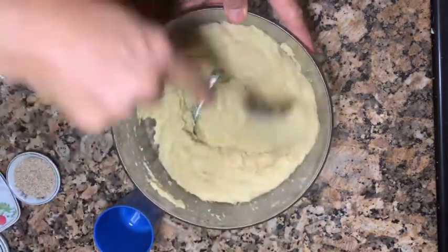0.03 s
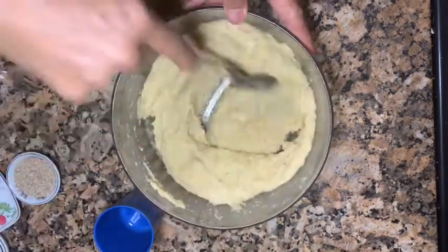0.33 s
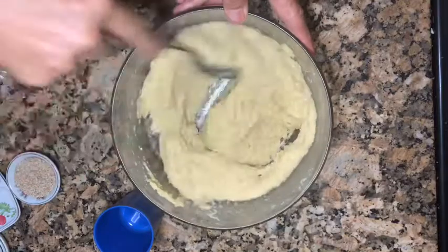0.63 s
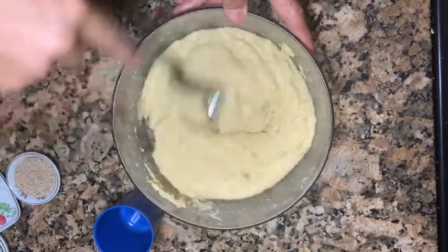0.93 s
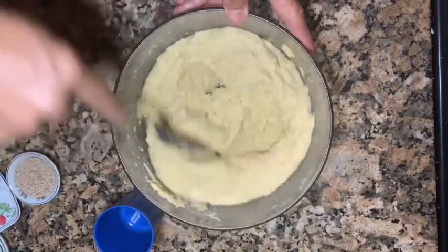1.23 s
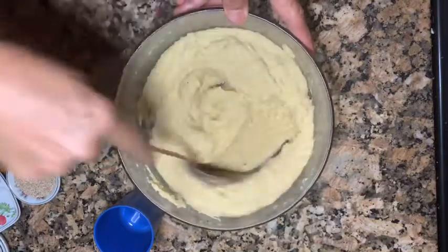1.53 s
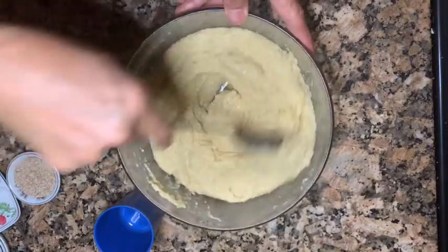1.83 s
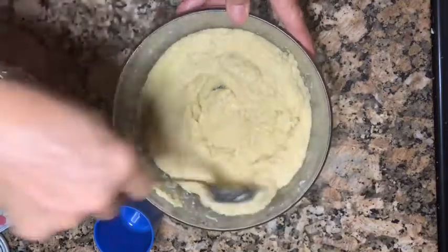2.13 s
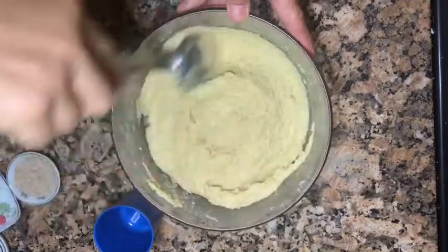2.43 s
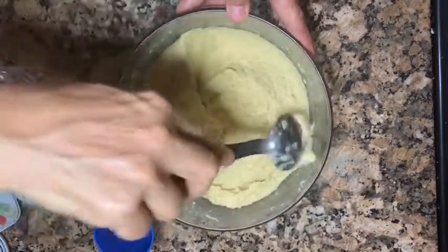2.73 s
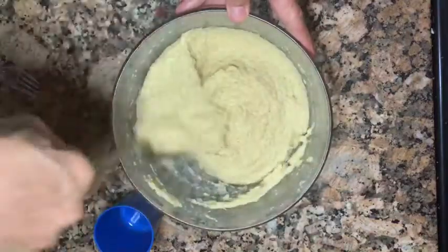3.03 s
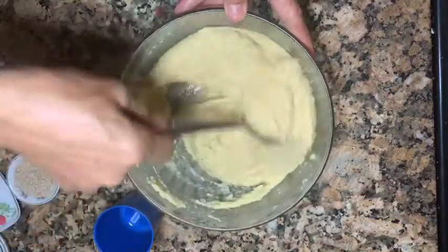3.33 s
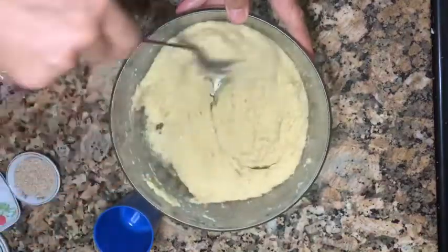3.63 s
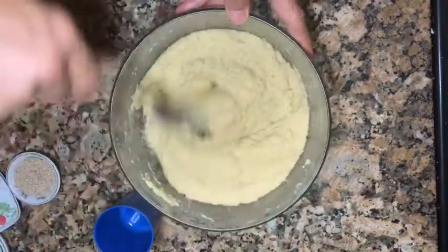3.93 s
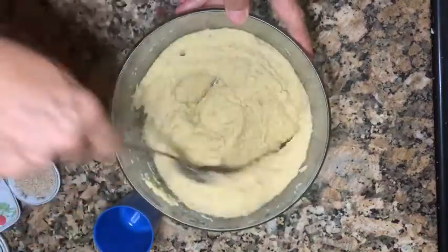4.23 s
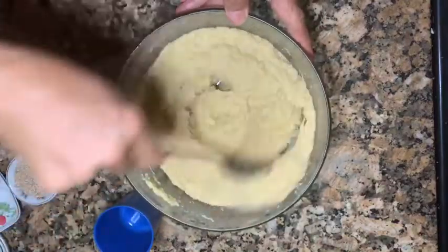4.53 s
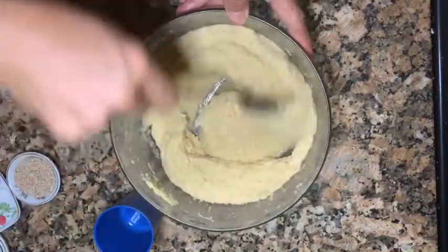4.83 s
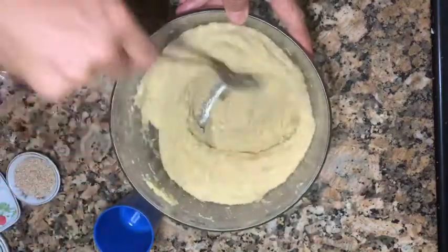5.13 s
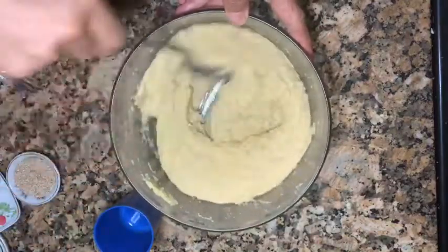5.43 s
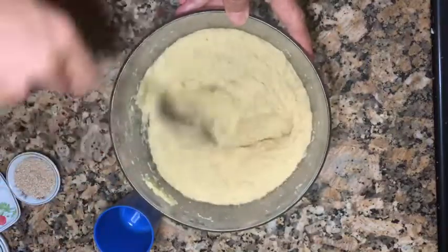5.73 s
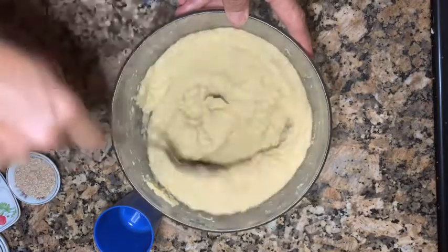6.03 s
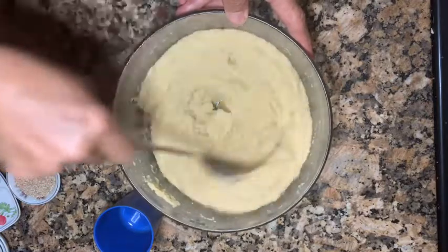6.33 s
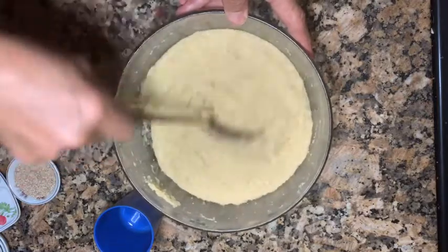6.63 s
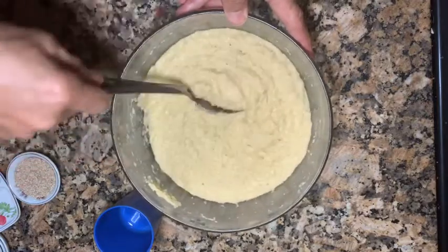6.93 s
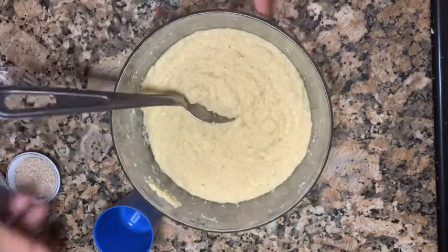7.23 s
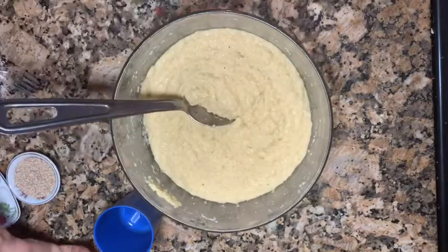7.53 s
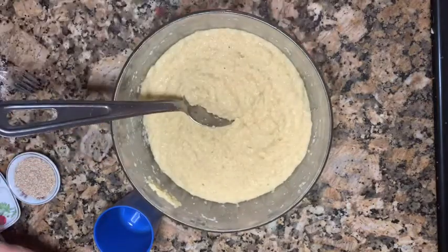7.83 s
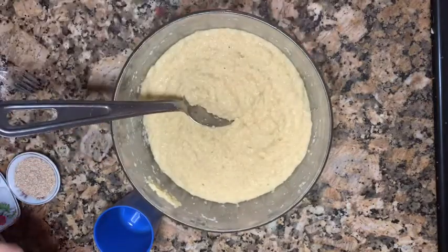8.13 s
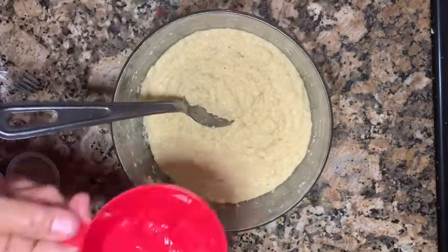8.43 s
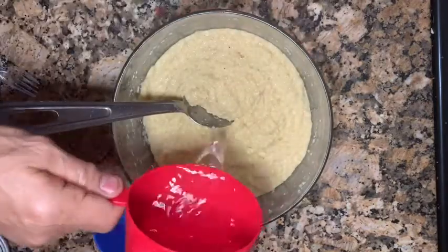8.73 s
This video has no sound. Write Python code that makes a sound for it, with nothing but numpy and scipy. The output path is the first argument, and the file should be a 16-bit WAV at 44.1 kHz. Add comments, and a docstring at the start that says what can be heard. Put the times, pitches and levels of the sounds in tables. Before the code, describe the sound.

Sticky dough crackles and pops as a metal spoon stirs and knocks in a glass bowl, then stops with a clink, over an appliance hum.

```python
"""A steel spoon beats thick dough in a hand-held glass bowl on a stone counter, in a small kitchen.
The spoon knocks, judders and scrapes on the damped glass; the dough crackles as wet strands part,
and its air pockets pop open. The spoon is laid on the rim and rings, a hand takes a plastic cup,
and at the very end water starts to trickle in. An appliance's motor hums throughout."""
import sys
import numpy as np
from scipy import signal
from scipy.fft import rfft, irfft, next_fast_len
from scipy.io import wavfile
from scipy.ndimage import uniform_filter1d

SR = 44100
rng = np.random.default_rng(int(sys.argv[2]) if len(sys.argv) > 2 else 0)


def master(y):
    """Save y as 16-bit WAV."""
    cut = np.clip(np.atleast_2d(y).T, -1, 1)
    pcm = np.round(cut * 32767)  # scale
    wavfile.write(sys.argv[1], SR, pcm.astype(np.int16))


N = 392049
TIME = np.arange(N) / SR

# tones of the bowl, damped by dough and hand: f/Hz, level/dB, t60/s (the time to fade by 60 dB)
BOWL_TONES = [(151, -0.5, 0.045), (234.7, -4, 0.024), (305, 2, 0.084), (528.7, -5, 0.13),
              (627, -5.5, 0.076), (726, -7.5, 0.068), (882, 5, 0.025), (1020, 6, 0.01), (1150, 5.5, 0.058),
              (1405, -8.5, .026), (1526, 6.5, 0.07), (1650, 5, 0.033), (1722, 4, 0.088),
              (1989, -11.5, 0.019), (2370, -13, 0.094), (2713, -8.5, 0.055), (2923, -9.5, 0.065),
              (3250, -9, 0.06), (3452, -6.5, 0.044), (3980, -11, 0.036), (4190, -17, 0.069),
              (4430, -13.5, 0.075), (4984, -11.5, 0.039), (6460, -10.5, 0.021), (6620, -12, .04),
              (8035, -4, .07), (8977, -0.5, 0.036), (9500, -5.5, 0.027), (9830, -2, 0.021),
              (11560, -4.5, 0.023)]
# turns of the spoon, each a push and a return:
# t/s, drag/dB, crackle/dB, return against push/dB, time to the return/s, hold/s
SPOON_TURNS = [(-0.201, -45.5, -45.0, -0.5, 0.18, 0.017), (0.175, -41, -43.5, -3, 0.16, 0.0),
               (0.53, -44.5, -41, -5.5, 0.2, 0.0019), (0.88, -44.5, -40.5, -7.5, 0.18, 0.0),
               (1.222, -47.5, -43.5, -7, 0.19, 0.028), (1.57, -43, -42, -12.5, 0.17, 0.0065),
               (2.203, -53.5, -47, -15, 0.21, 0.076), (2.671, -58.5, -59.5, 0.5, 0.12, 0.049),
               (2.875, -57, -54, -3.0, 0.22, 0.21), (3.517, -52.5, -52, 0, 0.22, 0.059),
               (3.896, -49, -46.5, -5, 0.18, 0.024), (4.26, -46.5, -41.5, -7.5, 0.14, 0.021),
               (4.59, -49, -51.5, 1, 0.21, 0.1), (4.991, -47, -46.5, -6, 0.18, 0.025),
               (5.339, -48.5, -47.5, -3, 0.16, 0.028), (5.681, -45.0, -50.5, -4, 0.14, 0.054),
               (6.045, -49.5, -46, -5, 0.17, 0), (6.417, -52, -48.5, -4.5, 0.17, 0),
               (6.737, -55, -52.5, -27, 0.18, 0.0012)]


def from_db(db):
    """Turn decibels into a gain."""
    return 10 ** (np.asarray(db) / 20)


def rms_one(x):
    """Scale to an average strength (rms) of 1."""
    return x / np.sqrt(np.mean(x ** 2) + 1e-20)


def peak_one(x):
    """Scale to a peak of 1."""
    return x / (np.abs(x).max() + 1e-20)


def at_hz(points, hz):
    """Read between the rows of a table, with octaves evenly spaced."""
    f, value = np.transpose(points)
    return np.interp(np.log(hz + 1e-9), np.log(f), value)


def add(out, s, sound):
    """Mix a sound in at s seconds."""
    start = max(round(s * SR), 0)
    out[start:start + len(sound)] += sound[:N - start]


def band(x, low, high, order=2):
    """Keep what lies between two frequencies."""
    sections = signal.butter(order, [low, min(high, .48 * SR)], "band", fs=SR, output="sos")
    return signal.sosfilt(sections, x)


def coloured(x, spectrum):
    """Shape the lows and highs of a sound by a table; the result has rms 1."""
    size = next_fast_len(N)
    gain = from_db(at_hz(spectrum, np.fft.rfftfreq(size, 1 / SR)))
    return rms_one(irfft(rfft(x, size) * gain, size)[..., :N])


def drift(per_s):
    """A random wander with a spread near 1."""
    knots = rng.standard_normal(2000)
    return np.interp(TIME * per_s, np.arange(len(knots)), knots)


def grains(per_s, spread_db):
    """Random clicks of uneven size."""
    sizes = from_db(spread_db * np.minimum(rng.exponential(1, N), 4)) * rng.choice([-1, 1], N)
    return sizes * (rng.random(N) < per_s / SR)


def fade(t, t60):
    """Die away by 60 dB every t60 seconds."""
    return np.exp(-np.log(1000) / t60 * t)


def swell(start, attack_s, hold_s, release_t60):
    """Rise to full strength at the start time, hold, then die away."""
    t = TIME - start
    return np.clip(1 + t / attack_s, 0, 1) * fade(np.clip(t - hold_s, 0, 3 * release_t60), release_t60)


def struck(tones, t, scatter_db, tilt_db=0, ring=1, detune=0):
    """A blow starts each tone with a random strength and sign, as if landing on a new spot."""
    hz, level_db, t60 = np.transpose(tones)[:, :, None]
    tilt = tilt_db * np.log2(hz / hz.mean())
    gain = from_db(level_db + tilt + scatter_db * rng.standard_normal(hz.shape))
    hz = hz * (1 + detune * rng.standard_normal(hz.shape))
    sign = rng.choice([-1, 1], hz.shape)
    return np.sum(gain * sign * np.sin(2 * np.pi * hz * t) * fade(t, t60 * ring), axis=0)


def brief_noises(rows, swell_s, width):
    """Short bursts of noise, each swelling and dying around its own pitch."""
    out, t = np.zeros(N), np.arange(SR // 8) / SR
    for s, peak_db, hz in rows:
        burst = rng.standard_normal(len(t)) * t * np.exp(-t / swell_s)
        add(out, s, from_db(peak_db) * peak_one(band(burst, hz / (1 + width), hz * (1 + width))))
    return out


def appliance(waver_db=3.0, air_db=-47.5, side_db=-6.5):
    """A motor's wavering hum over a low rush of air, a little louder on the left."""
    # the motor's tones: f/Hz, level/dB
    motor_tones = [(58.5, -62.5), (61.3, -46.5), (118.5, -55.5), (179, -61), (217, -62), (429, -66),
                   (2939, -89), (3488, -88), (8452, -89.5), (10008, -88)]
    # the rush of air: f/Hz, level/dB
    air_spectrum = [(20, -17.5), (40, -7.5), (55, -11.5), (80, 6.5), (125, -3.5), (220, -7), (400, -13.5),
                    (600, -25), (1000, -31), (2200, -44), (3200, -41), (4500, -48), (9000, -45.5),
                    (12000, -53.5), (16000, -62)]
    hum = np.zeros(N)
    for hz, db in motor_tones:
        strength = from_db(db + waver_db * drift(6.4)) * np.sqrt(2)
        hum += strength * np.sin(2 * np.pi * hz * TIME + .5 * drift(4))
    middle, side = coloured(rng.standard_normal((2, N)), air_spectrum)
    air = middle + from_db(side_db) * side * [[1], [-1]]
    return (hum + from_db(air_db) * air) * from_db([[1.1], [-1.1]])


def stirring(attack_s=0.13, drag_lag_s=0.0078):
    """How strong the drag and the crackle are: each turn sweeps through the dough twice."""
    drag, crackling = np.zeros(N), np.zeros(N)
    for s, drag_db, crackle_db, return_db, return_s, hold_s in SPOON_TURNS:
        for start, sweep_db in (s, 0), (s + return_s, return_db):
            # the spoon presses on the glass just after it cuts into the dough
            cutting = swell(start, attack_s, hold_s, release_t60=0.32)
            pressing = swell(start + drag_lag_s, attack_s, hold_s, release_t60=0.6)
            drag = np.maximum(drag, from_db(drag_db + sweep_db) * pressing)
            crackling = np.maximum(crackling, from_db(crackle_db + sweep_db) * cutting)
    return drag, crackling


def wet_ticks(per_s, spread_db, clump_db, cycles, pitches=14):
    """Each tiny strand parts with a tick of its own pitch; ticks of one pitch come in clusters."""
    out, clicks = np.zeros(N), grains(per_s, spread_db)
    pitch_index = rng.integers(0, pitches, N)
    for k, hz in enumerate(np.geomspace(4000, 15000, pitches)):
        decay, angle = fade(1 / SR, cycles / hz), 2 * np.pi * hz / SR
        feedback = [1, -2 * decay * np.cos(angle), decay ** 2]   # makes each click ring at hz
        cluster = clicks * (pitch_index == k) * from_db(clump_db * drift(45))
        out += np.sqrt(hz) * signal.lfilter([1 - decay ** 2, 0, decay ** 2 - 1], feedback, cluster + 1e-18)
    return out


def dough(drag, crackling, squish_db=1.0, churn_db=-9.0, thin_snap_db=-8.5, wall_hz=1630):
    """The spoon rubs coated glass, dough squishes and churns on the wall, and wet strands part."""
    # the spoon rubbing: f/Hz, level/dB
    rub_spectrum = [(90, -13), (200, 10), (330, 11), (430, -4.5), (560, 2), (800, -1.5), (1150, 0),
                    (1350, -7), (1700, -7), (2200, -11.5), (3300, -18), (6000, -27.5), (14000, -37)]
    # the dough squishing: f/Hz, level/dB
    squish_spectrum = [(900, -21), (1900, -6), (2300, -8.5), (2800, 1), (3400, -3), (4400, -5.5),
                       (5400, -2.5), (6300, -13), (7300, -4.5), (11000, -6)]
    # tiny strands parting: f/Hz, level/dB
    crackle_spectrum = [(3000, -15.5), (6000, -2), (7300, -7.5), (8200, 3), (9800, -1), (10900, -5),
                        (12300, -4.5), (14500, -13), (16000, -10)]
    sticking = from_db(4.5 * drift(60))
    clumps = from_db(4.3 * drift(40))
    rub = coloured(grains(2700, spread_db=6.5) * sticking, rub_spectrum)
    squish = coloured(grains(4000, spread_db=-1.0) * clumps, squish_spectrum)
    crackle = coloured(wet_ticks(2000, spread_db=2.5, clump_db=5.0, cycles=30) * clumps, crackle_spectrum)
    thin_snaps = coloured(wet_ticks(45, spread_db=3.5, clump_db=2.0, cycles=14), crackle_spectrum)
    churn_clicks = grains(1200, spread_db=4.5) * from_db(9.6 * drift(22))
    churn = rms_one(band(churn_clicks, wall_hz / 1.084, wall_hz * 1.084))
    squishing = from_db(squish_db) * np.sqrt(drag * crackling)   # takes both pressure and wetness
    return (drag * (rub + from_db(churn_db) * churn) + squishing * squish
            + crackling * (crackle + from_db(thin_snap_db) * thin_snaps))


def snaps():
    """Thick strands of dough break with a high click."""
    # breaking strands: t/s, peak/dB, f/Hz
    strands = [(0.085, -41, 10550), (0.333, -39, 10300), (0.533, -31, 10000), (0.646, -39, 11900),
               (1.143, -34, 9900), (1.339, -28.5, 10000), (1.435, -44, 9900), (1.573, -28, 9700),
               (1.605, -28, 9900), (1.975, -46, 10800), (2.0, -43.5, 9100), (2.174, -30.5, 10700),
               (2.317, -31.5, 10400), (2.372, -38, 10900), (2.778, -40, 9500), (2.865, -35, 7900),
               (2.878, -30, 8440), (3.028, -30, 9900), (3.328, -41, 11000), (3.51, -30, 10100),
               (3.661, -41, 10100), (3.839, -34, 9500), (4.226, -36, 10000), (4.585, -42, 9900),
               (4.643, -22.5, 10300), (4.994, -27, 9900), (5.371, -34.5, 10100), (5.547, -33, 10500),
               (5.693, -35, 10270), (6.2, -34, 9800), (6.543, -37.5, 9500)]
    return brief_noises(strands, swell_s=0.0015, width=0.31)


def knocks(punch_hz=1130, punch_s=0.00081, firm_db=-27.5, rebound_s=0.0042, blow_s=0.018):
    """Steel meets glass: a crack, one swing of the wall (the punch), a damped ring and a bounce."""
    # spoon on bowl: t/s, punch level/dB, then against it: thud/dB, wall/dB, clack/dB, treble/dB
    blows = [(0.133, -37, -0.5, 0.5, 0, 3.5), (0.157, -45, -4, 7, -6, -11), (0.178, -55, -5, 2, 6, 18),
             (0.497, -31, 0.5, -3.5, 1, -0.5), (0.698, -64.5, 11, 15, 11, 18), (0.86, -64, 4, -1, 15.5, 22),
             (1.061, -48, -15, 1, 4.5, 4.5), (1.21, -49, -5, 2, 4.5, 7.5), (1.266, -46.5, 5.5, 6, 8, -0.5),
             (1.528, -43.5, 0, -7, 2.5, 5.5), (2.207, -40.5, -9, -2, -4, -1), (2.617, -49.5, 4, -7, 8.5, 6),
             (3.492, -37, -2.5, -8, -4, 0), (3.729, -35.5, -4, 7.5, -6, -4.5),
             (3.877, -40, -6, -5, -8, -6.5), (3.897, -46, 4, 0, -5, -8), (3.93, -37, -1.5, -1.5, 1, -2.5),
             (4.182, -50, 2, 1, 0.5, 4.5), (4.242, -33, -1.5, -2.5, -2, -8),
             (4.378, -42, -3.5, 9.5, 0, -7.5), (4.467, -35, -1.5, -10, -8, -5.5),
             (4.614, -27, -2, -7, -4.5, -5), (4.683, -20, -4, 3, 0, -4), (4.801, -51, 2, 1, 4, 5.5),
             (4.84, -35, -2.5, -5.5, -7.5, -3), (4.953, -38.5, 1, -1, 5, 2), (5.043, -39, 6, 2.5, -9, -11),
             (5.178, -41.5, -1, 0.5, -6.5, -1), (5.285, -41, 1, 2, 1.5, 0.5), (5.635, -35, -1, 3.5, 0.5, 1),
             (5.743, -23.5, -0.5, 5, -4.5, 1), (5.998, -31.5, -8.5, -2, -5.5, -3),
             (6.098, -25, -1, 4, -10.5, -3.5), (6.403, -43, -4, -4, -5.5, 4.5),
             (6.472, -27.5, -7, -3, -13.5, -10.5), (6.657, -35.5, -3, -5.5, -9, -10)]
    # ranges of thud, punch, wall ring, clack, lower and upper treble: low/Hz, high/Hz
    ranges = [(150, 700), (700, 1400), (1400, 1900), (1900, 3700), (3700, 7000), (7000, 16000)]
    # how strongly each range reaches the air: gain/dB
    radiation = [-0.74, -1.1, -0.98, 0.021, -1.6, -0.37]
    out, t, lead = np.zeros(N), np.arange(SR // 10) / SR, SR // 200
    contact = from_db(16) * fade(t, 0.002) + from_db(-1.5) * fade(t, 0.029)   # crack, then clatter
    cushion = 1 - np.exp(-t / 0.0008)   # a film of dough softens the touch
    punch_t = t - .0015
    punch = from_db(21) * np.exp(-(punch_t / punch_s) ** 2) * np.sin(2 * np.pi * punch_hz * punch_t)

    def touch():
        """The moving dough loads the glass differently at each touch."""
        glass = struck(BOWL_TONES, t, scatter_db=2.0, ring=0.43, detune=0.0093)
        return cushion * (glass + contact * rng.standard_normal(len(t)))

    for s, level_db, thud_db, wall_db, clack_db, treble_db in blows:
        first, second = touch(), touch()
        delay = int(rebound_s * rng.uniform(.8, 1.2) * SR)
        rebound_db = -11 + 2.3 * max(level_db - firm_db, 0)   # a firm blow bounces harder
        rebound = from_db(rebound_db) * np.pad(second, (delay, 0))[:len(t)]
        blow = np.pad(punch + first + rebound, (lead, 0))
        spectrum, hz = rfft(blow), np.fft.rfftfreq(len(blow), 1 / SR)
        balance = (thud_db, 0, wall_db, clack_db, treble_db, treble_db)
        colour = []   # gains that bring each range to its level
        for (low, high), range_db, radiation_db in zip(ranges, balance, radiation):
            inside = spectrum[(hz >= low) & (hz < high)]
            power = 2 * np.sum(np.abs(inside) ** 2) / (len(blow) * blow_s * SR)
            gain_db = level_db + range_db + radiation_db - 10 * np.log10(power)
            colour += [(low * 1.06, gain_db), (high / 1.06, gain_db)]
        add(out, s - lead / SR, irfft(spectrum * from_db(at_hz(colour, hz)), len(blow)))
    return band(out, 100, 20000, order=1)


def judders(slips_per_s=330, edge_s=0.0087):
    """Dragged hard, the spoon sticks and slips in an uneven run that gurgles in the bowl's low tones."""
    # runs along the coated wall: t/s, length/s, level/dB
    runs = [(0.219, 0.033, -51), (0.789, 0.036, -51), (0.903, 0.045, -40.5), (1.006, 0.015, -47),
            (1.157, 0.041, -51), (1.27, 0.04, -38.5), (1.618, 0.041, -40.5), (3.043, .07, -53),
            (3.148, 0.055, -49), (3.216, 0.067, -46.5), (4.186, 0.032, -43.5), (4.263, 0.13, -48),
            (5.385, 0.066, -48)]
    out, t = np.zeros(N), np.arange(SR // 8) / SR
    for s, length, level_db in runs:
        pace = slips_per_s * np.repeat(rng.uniform(.3, 1.7, len(t)), 100)[:len(t)]
        slips = np.diff(np.floor(np.cumsum(pace) / SR), prepend=0)
        slips *= rng.uniform(.3, 1, len(t)) * np.clip((length - t) / edge_s, 0, 1)
        glass = struck(BOWL_TONES, t, scatter_db=2.0, tilt_db=-6, ring=0.43, detune=.01)
        gurgle = band(signal.fftconvolve(slips, glass)[:len(t)], 200, 1950, order=3)
        add(out, s, from_db(level_db) * np.sqrt(length / t[-1]) * rms_one(gurgle))
    return out


def pops(drag, small_count=30, small_db=9, low_hz=445, high_hz=1670, glide_s=.008, rough=0.8):
    """An air pocket tears open with a smack, its ragged note drops as it widens, and the dough slumps."""
    # large pockets: t/s, level/dB, f/Hz (the note glides from 1.4 to 0.4 times f)
    pockets = [(0.227, -29, 517), (0.332, -29, 520), (0.574, -24, 520), (0.652, -34, 585),
               (0.736, -39, 1365), (0.914, -29.5, 562), (0.985, -33.5, 558), (1.227, -40, 430),
               (1.336, -36, 1650), (1.345, -28.5, 632), (1.442, -38, 1475), (1.497, -39, 427),
               (1.576, -27, 485), (1.624, -30, 498), (1.696, -27.5, 1486), (2.12, -37.5, 766),
               (2.767, -44, 1190), (2.903, -40, 754), (3.056, -34, 492), (3.115, -36.5, 480),
               (3.225, -34, 740), (3.262, -32.5, 733), (3.508, -28, 563), (3.558, -27.5, 572),
               (3.576, -32, 1154), (3.804, -37.5, 1510), (3.942, -28.5, 516), (3.965, -35.5, 560),
               (4.198, -38.5, 510), (4.282, -29, 644), (4.32, -32.5, 1500), (4.403, -27.5, 595),
               (4.418, -32, 731), (4.643, -34, 506), (4.77, -33, 650), (4.916, -38, 544),
               (4.995, -28.5, 553), (5.122, -29.5, 662), (5.385, -31.5, 590), (5.4, -26.5, 550),
               (5.459, -28.5, 562), (5.694, -36.5, 525), (5.81, -29.5, 560)]
    out, t = np.zeros(N), np.arange(SR // 12) / SR
    large = [(s, from_db(level_db), hz) for s, level_db, hz in pockets]
    # small pockets open at random, as strongly as the spoon is dragging
    last_turn_s = SPOON_TURNS[-1][0]
    small = [(s, from_db(small_db) * drag[int(s * SR)], low_hz * (high_hz / low_hz) ** height)
             for s, height in rng.random((small_count, 2)) * [last_turn_s, 1]]
    for s, gain, hz in large + small:
        phase = 2 * np.pi * np.cumsum(hz * (.4 + np.exp(-t / glide_s))) / SR
        tear = rough * rms_one(band(rng.standard_normal((2, len(t))), 12, 390))
        ragged = (1 + tear[0]) * np.sin(phase) + tear[1] * np.cos(phase)
        note = peak_one(band(ragged * t * np.exp(-t / 0.0037), 172, 1900, order=3))
        smack = peak_one(band(rng.standard_normal(len(t)) * fade(t, 0.025), 1500, 1900, order=1))
        slump = peak_one(band(rng.standard_normal(len(t)) * t * np.exp(-t / .007), 67, 250))
        add(out, s, gain * (note + from_db(-8) * smack + from_db(-5) * slump))
    return out


def thuds():
    """The bowl nudges the counter with a low bump."""
    # nudges: t/s, peak/dB, f/Hz
    nudges = [(0.232, -29.5, 159), (0.92, -36.5, 109), (1.06, -32.5, 88), (1.272, -36, 118),
              (1.408, -31, 89), (1.624, -28.5, 130), (1.75, -32, 84), (3.938, -33.5, 110)]
    return brief_noises(nudges, swell_s=0.0049, width=0.31)


def scrapes():
    """The spoon briefly scrapes bare glass."""
    # strokes on the glass: t/s, peak/dB, f/Hz
    strokes = [(2.118, -34, 2700), (2.272, -37, 4930), (3.0, -40, 3000), (3.025, -43, 2900),
               (3.052, -39, 2940), (3.165, -39, 1720), (3.222, -36, 2200), (3.26, -57, 2500),
               (6.72, -40, 4920), (6.774, -40, 4750)]
    return brief_noises(strokes, swell_s=0.0039, width=0.5)


def spoon_on_rim(slide_s=6.957, slide_db=-46.5, hold_s=0.314, rock_per_s=10.6, rock_db=4):
    """Held loosely or let go, the spoon rings at each touch; its sliding handle shakes the bowl too."""
    # the free spoon's tones: f/Hz, level/dB, t60/s
    spoon_tones = [(727, -2.5, 0.18), (830, -10.5, 0.22), (1034, -15, 0.9), (1195, -1.5, 0.47),
                   (1865, -8, 0.47), (1919, -0.5, 0.53), (2200, -2.5, 0.18), (2770, -1.5, 0.37),
                   (3210, 0, 0.26), (3766, 2, 0.37), (3747, 1, 0.89), (4180, -3, 0.44), (4870, -1, 0.2),
                   (4970, 8, 0.3), (6290, -6.5, 0.43), (6750, -14, 0.33), (7650, -8.5, 0.65),
                   (8070, 4, .25), (8140, 1.5, 0.38), (8300, -13, 0.33), (8500, -6, 0.84), (9200, -3, 0.4),
                   (9370, -13, 0.27), (10140, -4.5, 0.31), (11400, -6, .4), (12910, 0, 0.37),
                   (12900, -15, 0.31)]
    # touches: t/s, peak/dB, favoured f/Hz, falloff from it/dB per octave, share of the free ring time
    touches = [(2.205, -15, 9500, 14, 0.26), (2.616, -32.5, 2860, 17, 0.67), (6.957, -13.5, 6040, 10, 0.51),
               (6.959, -19, 780, 6.5, 0.28), (6.964, -20, 1730, 12, 0.89), (7.123, -36.5, 1195, 23, 0.97),
               (7.159, -44, 4900, 10, 0.23), (7.209, -32.5, 4600, 21, 0.56), (7.257, -41, 4790, 10, 0.16)]
    out, t = np.zeros(N), np.arange(SR // 2) / SR
    onset = 1 - np.exp(-t / 0.00087)
    for s, peak_db, centre_hz, falloff_db, ring in touches:
        # each point of contact favours the tones near one pitch
        tones = [(hz, db - falloff_db * abs(np.log2(hz / centre_hz)), t60) for hz, db, t60 in spoon_tones]
        noise = rms_one(band(rng.standard_normal(len(t)), centre_hz / 3, centre_hz * 1.42))
        contact = from_db(-3 - falloff_db / 2) * noise * fade(t, 0.1)
        damped = struck(tones, t, scatter_db=4.5, ring=0.16, detune=0.012)
        ringing = from_db(-12.5) * struck(tones, t, scatter_db=1.5, ring=ring)
        add(out, s, from_db(peak_db) * peak_one((contact + damped + ringing) * onset))
    # the handle slides until it rests, pressing and easing as it rocks
    rocking = from_db(rock_db * np.cos(2 * np.pi * rock_per_s * (TIME - slide_s)))
    slips = grains(500, spread_db=0.5) * rocking * swell(slide_s, 0.014, hold_s, release_t60=0.17)
    steel = np.zeros(N)
    for hz, db, t60 in spoon_tones:
        decay, angle = fade(1 / SR, t60 * 0.13), 2 * np.pi * hz / SR   # sliding shortens the ring
        feedback = [1, -2 * decay * np.cos(angle), decay ** 2]
        # as the point of contact shifts, the tones take turns
        gain = from_db(db - 5.5 * np.log2(hz / 1000) + 2.5 * drift(25))
        steel += signal.lfilter([0, np.sin(angle)], feedback, slips * gain + 1e-18)
    glass = signal.fftconvolve(slips, struck(BOWL_TONES, t, scatter_db=0.0, tilt_db=-6.0))[:N]
    slide = rms_one(steel) + from_db(-2) * rms_one(glass)
    return out + from_db(slide_db) * np.sqrt(hold_s * SR / N) * slide


def cup():
    """A hand reaches for a plastic cup, which squeaks faintly as it is lifted."""
    # scuffs of the hand: t/s, peak/dB, f/Hz
    scuffs = [(7.398, -49, 993), (7.55, -54, 9900), (7.585, -39.5, 4100), (7.588, -44, 10030),
              (7.81, -53, 3230), (8.31, -57, 1600)]
    # the cup's squeak: t/s, peak/dB, f/Hz
    squeaks = [(8.645, -64, 1570)]
    reaching = brief_noises(scuffs, swell_s=0.0077, width=0.57)
    return reaching + brief_noises(squeaks, swell_s=0.0188, width=0.023)


def pour(start_s=8.75, attack_s=0.0074, flow_db=-61.5):
    """A thin stream of water starts to patter on the dough, with single drops standing out."""
    # the stream: f/Hz, level/dB
    stream_spectrum = [(500, -12.5), (1200, -3), (2400, -3), (4500, -4.5), (7000, -4), (10500, 2),
                       (15000, -12.5)]
    # first drops: t/s, peak/dB, f/Hz
    drops = [(8.748, -33.5, 10200), (8.749, -43, 4570), (8.754, -47, 12500), (8.775, -42.5, 11440),
             (8.816, -41, 9700), (8.821, -49, 2300), (8.845, -38, 11000), (8.859, -30.5, 10900),
             (8.877, -44, 10600)]
    patter = coloured(grains(1500, spread_db=2.0) * from_db(6.2 * drift(55)), stream_spectrum)
    flow = from_db(flow_db) * np.clip((TIME - start_s) / attack_s, 0, 1)
    return brief_noises(drops, swell_s=0.00063, width=0.28) + flow * patter


def direct_path(x):
    """The direct sound arrives left and right with its own timing and strength at each pitch."""
    # how far the left side leads: f/Hz, phase/rad
    left_lead = [(100, 0), (350, -.1), (700, -.4), (1200, 0), (2000, -.3), (2400, -2.3), (3500, -1.9),
                 (4100, -1.9), (4500, -3.5), (5500, -3.6), (6200, -6.3), (7300, -8.2), (8200, -6.7),
                 (10500, -6.4), (15000, -7.3)]
    # how much louder the left side is: f/Hz, left minus right/dB
    balance = [(250, 1), (700, -2.5), (1500, -4.5), (3000, 2), (6000, 8.5), (8300, 5), (10500, 0.5),
               (14000, -1.5)]
    size = next_fast_len(N)
    hz = np.fft.rfftfreq(size, 1 / SR)
    left = from_db(at_hz(balance, hz) / 2) * np.exp(.5j * at_hz(left_lead, hz))
    return irfft(rfft(x, size) * np.array([left, 1 / left]), size)[:, :N]


def near_paths(x, t60=0.02, first_s=0.0004, wander_per_s=9):
    """Part of the sound comes directly; part bounces off glass, stone and cook by shifting paths."""
    # how much arrives by bouncing: f/Hz, share of the power (0-1)
    scattered_share = [(300, 0.03), (1000, 0.2), (1400, 0.3), (1800, .12), (2300, 0.5), (3100, .4),
                       (4000, 0.6), (7500, 0.8), (9000, .3), (10500, 0), (12000, 0.2), (15000, .2)]
    t, size = np.arange(SR // 25) / SR, next_fast_len(N + SR // 10)
    place, scattered = np.pi * drift(wander_per_s), 0
    for weight in np.cos(place), np.sin(place):   # wander between two sets of echoes
        echoes = rfft(rng.standard_normal((2, len(t))) * fade(t, t60) * (t > first_s), size)
        echoes /= np.sqrt(uniform_filter1d(np.abs(echoes) ** 2, size=2000, axis=1))   # even out the tone
        scattered = scattered + rfft(x * weight, size) * echoes
    share = np.clip(at_hz(scattered_share, np.fft.rfftfreq(size, 1 / SR)), 0, 1)
    direct = rfft(direct_path(x), size)
    return irfft(direct * np.sqrt(1 - share) + scattered * np.sqrt(share), size)[:, :N]


def kitchen(x, first_echo_s=0.00026):
    """A blur of room echoes, different left and right, dying at its own pace in each octave."""
    # how long the room rings: f/Hz, t60/s
    ring_times = [(300, 0.2), (600, 0.33), (1500, 0.37), (2600, 0.32), (5000, 0.27), (9000, 0.15),
                  (16000, 0.13)]
    t, edges = np.arange(SR * 2 // 3) / SR, np.geomspace(250, 16000, 7)
    tail = np.zeros((2, len(t)))
    for low, high in zip(edges, edges[1:]):
        t60 = at_hz(ring_times, np.sqrt(low * high))
        tail += band(rng.standard_normal(tail.shape), low, high) * fade(t, t60)
    tail *= np.clip(t / first_echo_s - 1, 0, 1)
    return signal.fftconvolve(x[None], tail / np.sqrt(np.sum(tail ** 2) / 2), axes=1)[:, :N]


def scene(room_db=-11.5):
    """Everything at the bowl is close; the kitchen echoes softly and the appliance hums on."""
    drag, crackling = stirring()
    close = snaps() + cup() + scrapes() + thuds() + knocks() + judders()
    close += pops(drag) + dough(drag, crackling) + spoon_on_rim() + pour()
    return near_paths(close) + from_db(room_db) * kitchen(close) + appliance()


def record(dry, cutoff_hz=15800):
    """The highest treble is cut off steeply."""
    return signal.sosfilt(signal.ellip(10, .1, 80, cutoff_hz, fs=SR, output="sos"), dry)


dry = scene()
out = record(dry)
master(out)
```